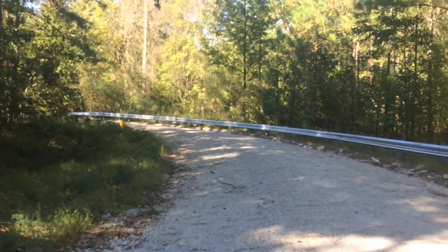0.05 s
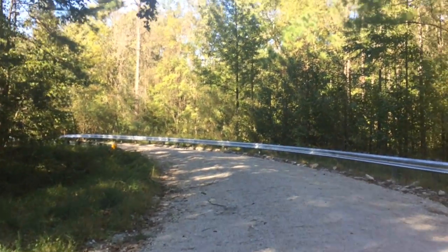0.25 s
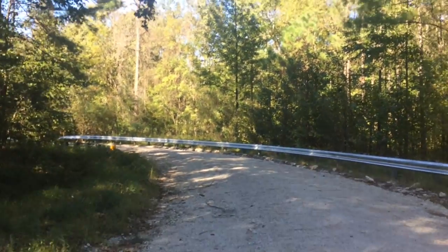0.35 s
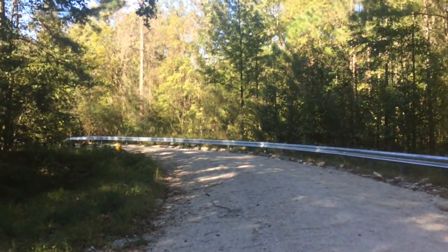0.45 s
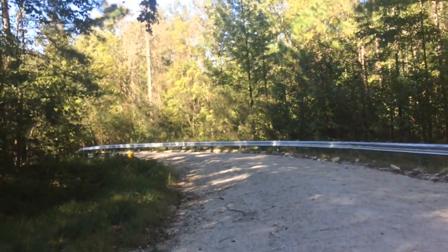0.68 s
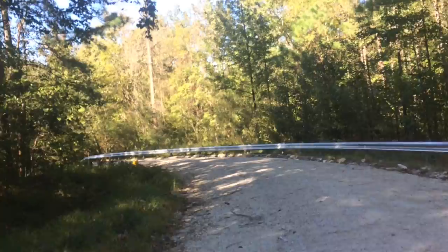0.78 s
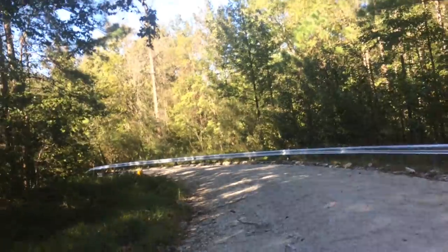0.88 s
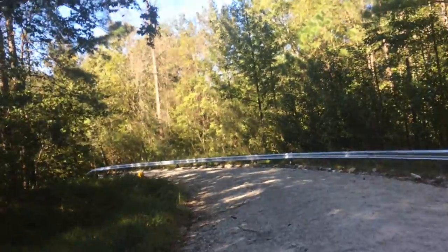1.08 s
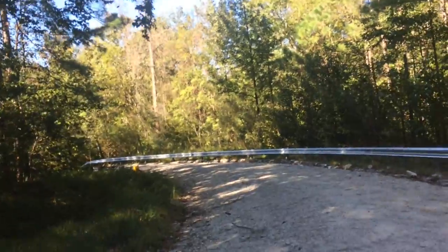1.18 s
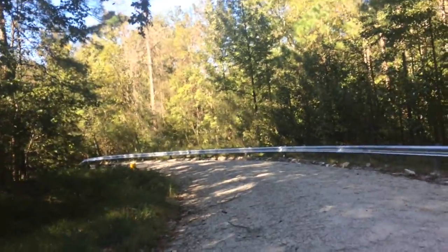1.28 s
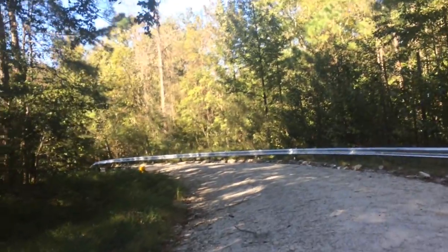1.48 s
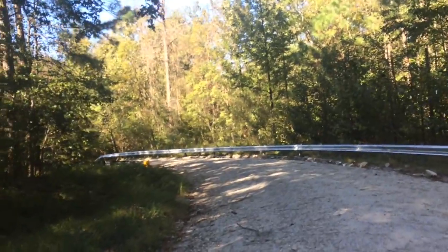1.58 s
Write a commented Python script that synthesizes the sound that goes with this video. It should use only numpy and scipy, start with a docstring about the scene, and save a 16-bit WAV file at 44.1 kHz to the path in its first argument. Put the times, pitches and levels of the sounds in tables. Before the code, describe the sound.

A walker takes three slow steps on packed gravel, first a hard crunching scuff, then small stones pattering, then two light crunches. Open, quiet woodland, close microphone, faint low rumble and slight handling thumps.

```python
"""Gravel footsteps in quiet woods

Three steps on a gravel road, the first heavy and close, the others light. Each heel or sole contact
drives random grain showers: a packed-bed thud, a stone crunch and a grit fizz; damped sines knock and tick.
Kicked grit ticks down between the steps, soft noise brushes around the last one, and a weak tail follows.
Behind lie a low rumble and faint air of coloured noise, one tiny far sine peep and dull microphone bumps.
"""
import sys
import numpy as np
from scipy import signal
from scipy.fft import rfft, irfft
from scipy.io import wavfile
from scipy.ndimage import uniform_filter1d

SR = 44100
rng = np.random.default_rng(int(sys.argv[2]) if len(sys.argv) > 2 else 0)


def bounce(signal):
    """Save signal as a 16-bit WAV file at the path given by the first command-line argument."""
    frames = np.transpose(np.atleast_2d(signal))
    limited = np.clip(frames, -1, 1)
    pcm = np.round(limited * 32767).astype(np.int16)
    wavfile.write(sys.argv[1], SR, pcm)


N = 72765

# Tone of the background, the far end of the trees and the brushing: freq_hz [Hz], relative_level_db [dB]
RUMBLE_COLOUR = [(15, -31), (28, -8.5), (48, -5), (70, -1), (100, -3.5), (140, 2), (185, -0.5),
                 (225, -16.5), (400, -31.5), (1200, -53)]
AIR_COLOUR = [(100, -2.5), (380, 1), (650, -2.5), (1100, -6), (1700, -12), (2800, -20), (5000, -21.5),
              (8000, -26), (11000, -32.5), (15000, -32)]
TREE_COLOUR = [(200, -10.5), (1200, -1), (12000, -3.5)]
BRUSH_COLOUR = [(500, -13), (1500, 0.5), (3000, -2.5), (4200, -11), (7000, -18), (15000, -36)]
# Tone of the packed bed, the grinding stones and the crushed grit: freq_hz [Hz], relative_level_db [dB]
THUD_COLOUR = [(40, -36), (90, -6.5), (200, -7.5), (330, -1.5), (520, 0.5), (800, -8.5), (1300, -34),
               (4000, -55)]
CRUNCH_COLOUR = [(200, -24.5), (650, -9), (1050, 1.5), (1400, -1.5), (1900, -4), (2600, -15), (4000, -22),
                 (15000, -51)]
GRIT_COLOUR = [(800, -56), (2400, 10.5), (3800, -1.5), (5800, 2.5), (8500, -1.5), (11500, -10),
               (15000, -9.5)]
# Filters for knocking stones and for hard cracks: freq_hz [Hz], gain_db [dB]
KNOCK_COLOUR = [(300, -35), (650, -11.5), (950, 0), (1900, -0.5), (2500, -10), (3400, -18), (8000, -35)]
CRACK_COLOUR = [(1000, -16), (2500, -5), (6000, 3), (10000, -2), (15000, 0)]

# Dull low bumps of the carried microphone: start_s [s], pitch_hz [Hz], swell_peak_db [dB]
MICROPHONE_BUMPS = [(.593, 71, -39), (0.982, 87, -39.5), (1.078, 77.5, -41), (1.29, 75.6, -42),
                    (1.365, 66.4, -43), (1.473, 99, -39)]
# Soft brushing around the last step: start_s, attack_s, hold_s, release_s [s to -20 dB], level_db [dB]
BRUSHES = [(1.377, 0.024, 0.047, .12, -67.5), (1.481, .04, 0.036, 0.019, -51), (1.57, 0.018, .06, .06, -62)]
# Heel skid, then grit thrown by the first step: start_s, attack_s, hold_s, release_s [s to -20 dB]
SKID_ENVELOPE = (.283, 0.0055, .011, 0.0094)
SPRAY_ENVELOPE = (.3, .01, 0.062, .33)
# Stones knocking under the shoe: start_s [s], pitch_hz [Hz], level_db [dB, before the knock filter]
STONE_KNOCKS = [(0.2374, 1860, -18.5), (0.2482, 1470, -19), (0.252, 1310, -30), (0.2624, 1870, -22),
                (0.2635, 1370, -35), (0.274, 1050, -31), (0.281, 1350, -38), (0.3012, 1220, -29.5),
                (0.3484, 1360, -42), (0.3601, 930, -32.5), (.434, 1370, -43), (.456, 1200, -34.5),
                (.495, 1370, -35.5), (0.9302, 980, -28.5), (0.9494, 1140, -31), (0.9926, 1180, -28.5),
                (1.0139, 1250, -26), (1.0427, 1180, -36.5), (1.0991, 1210, -22), (1.517, 1600, -37),
                (1.5307, 1280, -27.5), (1.5544, 1430, -27), (1.5615, 1170, -32.5)]
# Small chips snapping or landing: start_s [s], pitch_hz [Hz], ring_db [dB],
# crack_db [dB, before the crack filter]
CHIP_TICKS = [(0.299, 6560, -28, -40), (0.426, 4000, -41, -62), (0.4575, 5240, -41, -47),
              (0.4641, 2190, -38.5, -44), (0.476, 9300, -40, -47), (.4787, 2400, -48, -44),
              (.4946, 3650, -41.5, -47), (.5004, 3160, -48, -62), (0.517, 12400, -35, -56),
              (0.5218, 2620, -37.5, -50), (0.556, 2100, -53, -45), (.5625, 3570, -44, -38.5),
              (0.5956, 4500, -45, -41), (0.6195, 4540, -30.5, -40.5), (0.6254, 4800, -39, -46),
              (.6311, 2800, -53, -52), (.6588, 4800, -49, -48), (0.7117, 2300, -43, -46),
              (0.7535, 2330, -41, -38.5), (0.7758, 2350, -40, -39), (0.8563, 2060, -44.5, -47.5),
              (.877, 10900, -47, -50), (1.01, 6000, -30.5, -36.5), (1.0102, 11800, -49, -35),
              (1.299, 9100, -55, -50.5), (1.527, 3230, -27, -56), (1.5516, 3000, -29.5, -45)]
# Foot contacts: start_s, attack_s, hold_s, release_s [s to -20 dB], thud_db, crunch_db, grit_db [dB]
FOOT_CONTACTS = [(0.233, 0.004, 0.0073, 0.0056, -35, -35, -47),
                 (0.2443, 0.0019, 0.005, .02, -28.5, -32, -36.5),
                 (0.26, 0.0036, 0.027, 0.0455, -28.5, -35.5, -42),
                 (.335, 0.0029, 0.021, 0.0132, -39.5, -39, -56),
                 (0.386, 0.012, 0.011, 0.07, -51, -48.5, -60),
                 (0.925, 0.0025, 0.031, 0.0357, -44, -48.5, -59.5),
                 (0.9864, 0.0035, 0.025, 0.04, -59, -46.5, -61.5),
                 (1.473, 0.0013, 0.0075, .05, -53, -55, -63.5),
                 (1.501, 0.016, 0.036, 0.06, -54, -43.5, -67)]
# Heel weight thumping the bed: start_s [s], pitch_hz [Hz], swell_peak_db [dB], decay_s [s]
HEEL_THUMPS = [(0.247, 371, -14, 0.0021), (0.2668, 134, -24, 0.0049), (.273, 513, -30.5, 0.0018),
               (0.282, 343, -23, 0.0022), (0.3482, 516, -25.5, 0.00077)]

# Envelopes: start_s, attack_s, hold_s, release_s
PEEP_ENVELOPE = (1.43, 0.007, 0.0059, 0.045)
SETTLE_ENVELOPE = (0.89, 0.05, 0.15, 1)
STRAY_ENVELOPE = (0.36, 0.066, 0.17, 0.25)

RUMBLE_DB, AIR_DB = -48.5, -56
PEEP_HZ, PEEP_DB = 4590, -62
TAIL_T60_S, TAIL_DB = 0.51, -19.5
BUMP_DECAY_S = 0.0078
SKID_HZ, SKID_WIDTH_HZ, SKID_DB = 6400, 2000, -38.5
SPRAY_PER_S, SPRAY_DB = 650, -59.5
STRAY_PER_S, STRAY_DB = 130, -73
SETTLE_DB = -63
KNOCK_DECAY_S, KNOCK_UPPER_RATIO, KNOCK_UPPER_DB = 0.00046, 1.45, -8
KNOCK_CRACK_DB = -29  # relative to the knock
TICK_CYCLES, CRACK_DECAY_S = 0.46, 0.00055
THUD_PER_S, CRUNCH_PER_S, GRIT_PER_S = 1100, 900, 3900
SIZE_SPREAD_DB = 1.5
CLUMP_S, CLUMP_SPREAD_DB = 0.003, 2.5
TOP_HZ = 15400


def undb(db):
    """Decibels to gain."""
    return 10 ** (np.asarray(db) / 20)


def unit(x):
    """Scale to rms 1."""
    return x / np.sqrt(np.mean(x ** 2) + 1e-18)


def since(start):
    """Seconds since a moment, zero before it."""
    return np.maximum(np.arange(N) / SR - start, 0)


def envelope(start, attack, hold, release):
    """Linear rise, hold, then a fall of 20 dB per release time."""
    rise = np.minimum(since(start) / attack, 1)
    fall_db = -20 * since(start + attack + hold) / release
    return rise * undb(fall_db)


def colour(x, points, size=8192):
    """Minimum-phase filter through (Hz, dB) points, so no sound precedes its cause."""
    hz, db = np.array(points, float).T
    bins_hz = np.fft.rfftfreq(size, 1 / SR)
    gain_db = np.interp(np.log(bins_hz + 1), np.log(hz), db)
    cepstrum = irfft(np.log(undb(gain_db)))
    # Folding the cepstrum forward makes the filter causal.
    cepstrum[1:size // 2] *= 2
    cepstrum[size // 2 + 1:] = 0
    impulse = irfft(np.exp(rfft(cepstrum)))
    return signal.fftconvolve(x, impulse)[:N]


def coloured_noise(points):
    """Steady noise of one tone, at rms 1."""
    return unit(colour(rng.standard_normal(N), points))


def shower(per_s):
    """Random tiny impacts of unequal size and either sign."""
    hit = rng.random(N) < per_s / SR
    sign = np.sign(rng.standard_normal(N))
    return hit * sign * undb(SIZE_SPREAD_DB * rng.standard_normal(N))


def grains(per_s, points, size=700):
    """Impacts ringing with one colour; under a steady load their power stays even."""
    x = unit(colour(shower(per_s), points))
    local_power = np.abs(uniform_filter1d(x ** 2, size))
    return x / np.sqrt(local_power + 1e-3)


def ring(start, hz, decay):
    """A heavily damped vibration that swells, then dies away."""
    t = since(start)
    swell = t / decay * np.exp(1 - t / decay)
    return swell * np.sin(2 * np.pi * hz * t)


def crack(start):
    """The brief broadband burst of a hard contact: noise that decays exponentially."""
    t = since(start)
    return (t > 0) * np.exp(-t / CRACK_DECAY_S) * rng.standard_normal(N)


def woods():
    """Low rumble and faint air as steady coloured noise, with a short far sine peep."""
    rumble = undb(RUMBLE_DB) * coloured_noise(RUMBLE_COLOUR)
    air = undb(AIR_DB) * coloured_noise(AIR_COLOUR)
    peep = undb(PEEP_DB) * envelope(*PEEP_ENVELOPE) * np.sin(2 * np.pi * PEEP_HZ * since(0))
    return rumble + air + peep


def trees(x):
    """Weak diffuse scatter from the trunks, as a tail of decaying noise."""
    decay = np.exp(-np.log(1000) * since(0) / TAIL_T60_S)
    tail = colour(rng.standard_normal(N), TREE_COLOUR) * decay
    tail = tail / np.sqrt(np.sum(tail ** 2))
    return undb(TAIL_DB) * signal.fftconvolve(x, tail)[:N]


def handling():
    """The carried microphone is jolted now and then, each jolt a low damped bump."""
    return sum(undb(db) * ring(start, hz, BUMP_DECAY_S) for start, hz, db in MICROPHONE_BUMPS)


def heel_skid():
    """The heel skids with a bright rasp: grit grains through a narrow resonance."""
    resonance = signal.iirpeak(SKID_HZ, SKID_HZ / SKID_WIDTH_HZ, fs=SR)
    rasp = signal.lfilter(*resonance, grains(GRIT_PER_S, GRIT_COLOUR))
    return undb(SKID_DB) * envelope(*SKID_ENVELOPE) * unit(rasp)


def loose_grit():
    """The first step sprays grit, stray specks land, and stones settle around the second step."""
    spray = unit(colour(shower(SPRAY_PER_S), GRIT_COLOUR))
    stray = unit(colour(shower(STRAY_PER_S), CRACK_COLOUR))
    settling = grains(CRUNCH_PER_S, CRUNCH_COLOUR)
    return (undb(SPRAY_DB) * envelope(*SPRAY_ENVELOPE) * spray
            + undb(STRAY_DB) * envelope(*STRAY_ENVELOPE) * stray
            + undb(SETTLE_DB) * envelope(*SETTLE_ENVELOPE) * settling)


def brushing():
    """Soft brushing around the last step: coloured noise in swells."""
    swells = sum(undb(db) * envelope(start, attack, hold, release)
                 for start, attack, hold, release, db in BRUSHES)
    return coloured_noise(BRUSH_COLOUR) * swells


def stones():
    """Stones knock hollowly in two modes, chips tick brightly, and both crack on contact."""
    knocks, chips, cracks = np.zeros(N), np.zeros(N), np.zeros(N)
    for start, hz, db in STONE_KNOCKS:
        lower = ring(start, hz, KNOCK_DECAY_S)
        upper = ring(start, hz * KNOCK_UPPER_RATIO, KNOCK_DECAY_S / 2)
        knocks += undb(db) * (lower + undb(KNOCK_UPPER_DB) * upper)
        cracks += undb(db + KNOCK_CRACK_DB) * crack(start)
    for start, hz, ring_db, crack_db in CHIP_TICKS:
        chips += undb(ring_db) * ring(start, hz, TICK_CYCLES / hz)
        cracks += undb(crack_db) * crack(start)
    return colour(knocks, KNOCK_COLOUR) + chips + colour(cracks, CRACK_COLOUR)


def clumps():
    """Stones give way in fits: the force swings to a new random level every few milliseconds."""
    count = N // 20
    knots_s = np.cumsum(CLUMP_S * (0.5 + rng.random(count)))
    swing = np.interp(since(0), knots_s, rng.standard_normal(count))
    return unit(undb(CLUMP_SPREAD_DB * swing))


def footfalls():
    """Contacts press on bed, stones and grit as three grain showers; heel weight adds damped thumps."""
    fits = clumps()
    thud = grains(THUD_PER_S, THUD_COLOUR)
    crunch = fits * grains(CRUNCH_PER_S, CRUNCH_COLOUR)
    grit = fits * grains(GRIT_PER_S, GRIT_COLOUR)
    out = np.zeros(N)
    for start, attack, hold, release, thud_db, crunch_db, grit_db in FOOT_CONTACTS:
        layers = undb(thud_db) * thud + undb(crunch_db) * crunch + undb(grit_db) * grit
        out += envelope(start, attack, hold, release) * layers
    for start, hz, db, decay in HEEL_THUMPS:
        out += undb(db) * ring(start, hz, decay)
    return out


def scene():
    """The walker close by, the woods around."""
    steps = footfalls() + stones() + heel_skid() + loose_grit() + brushing()
    return (woods() + trees(steps) + handling() + steps)[None]


def record(dry):
    """The recorder cuts the top with a steep low-pass."""
    low_pass = signal.ellip(8, 0.2, 70, TOP_HZ, fs=SR, output="sos")
    return signal.sosfilt(low_pass, dry)


dry = scene()
out = record(dry)
bounce(out)
```